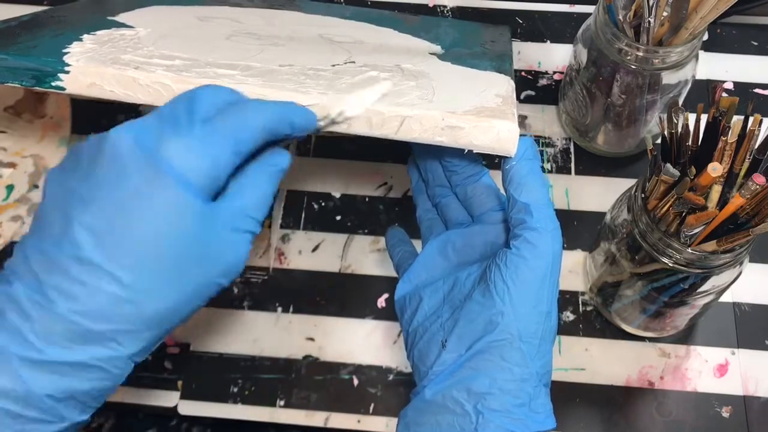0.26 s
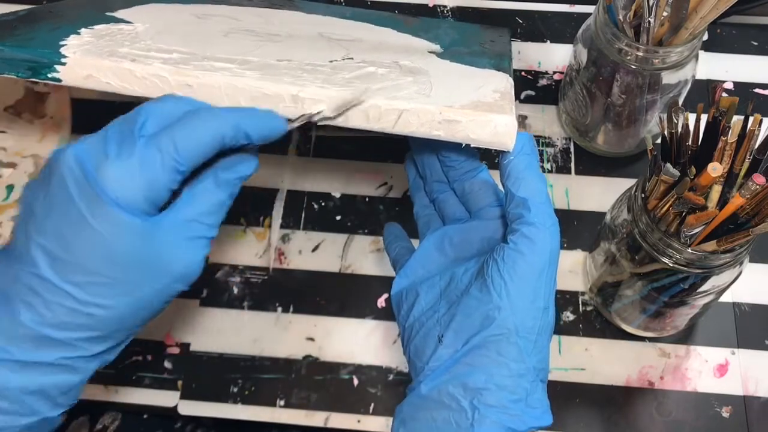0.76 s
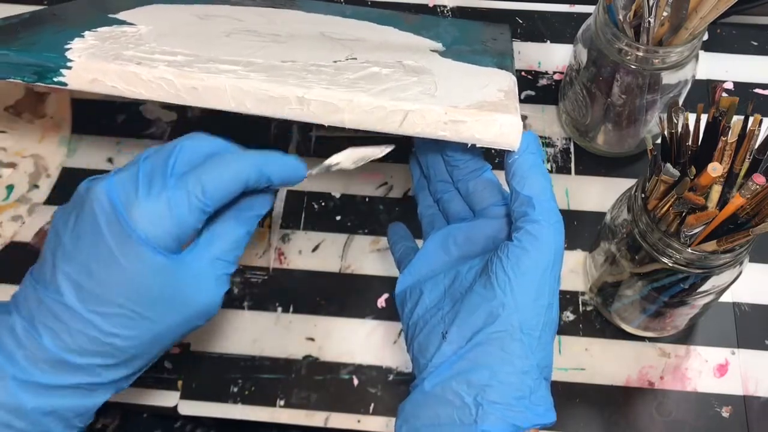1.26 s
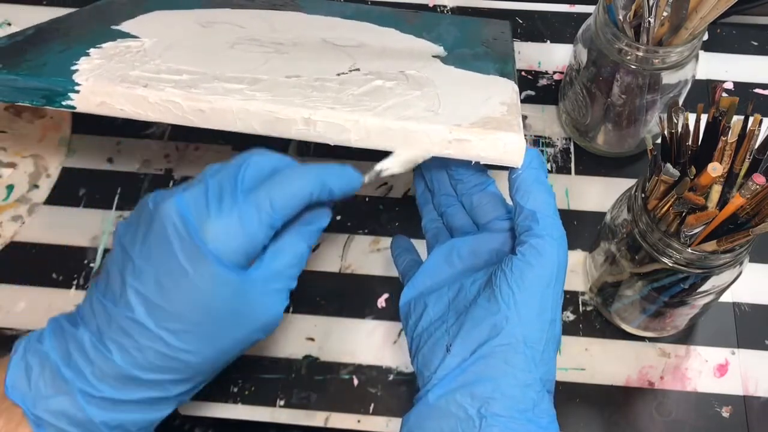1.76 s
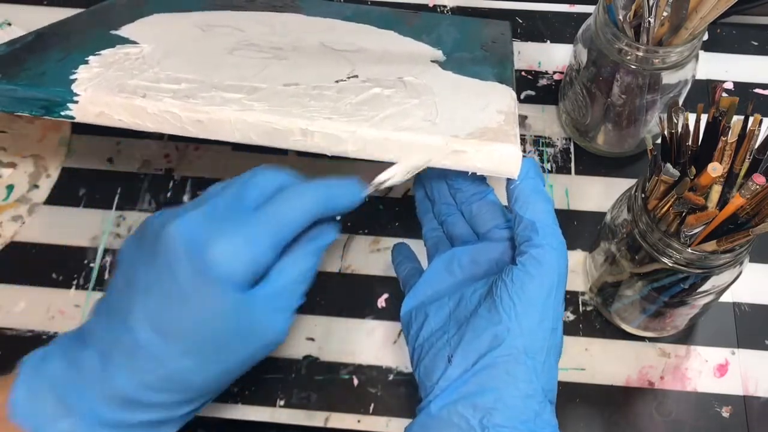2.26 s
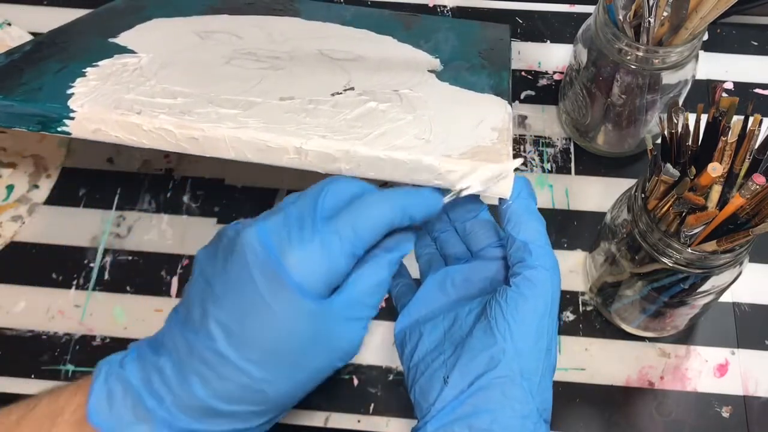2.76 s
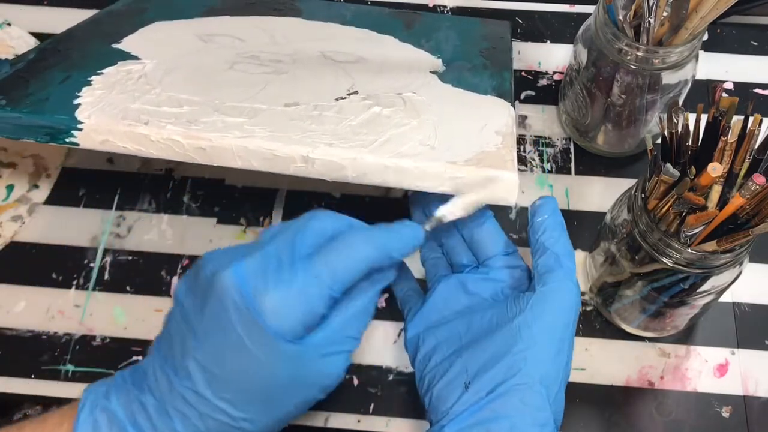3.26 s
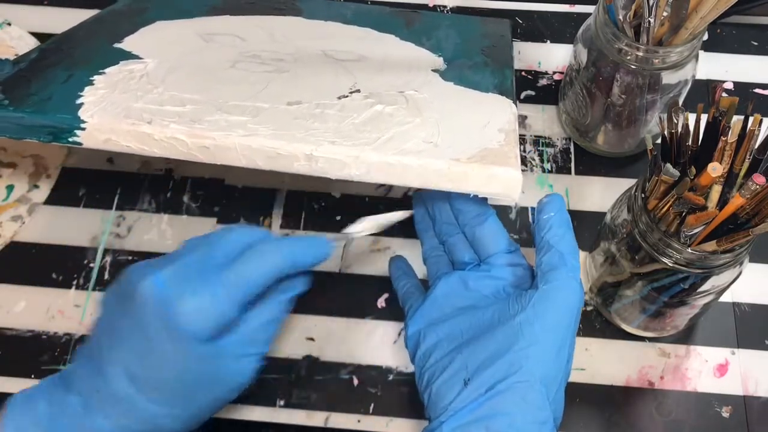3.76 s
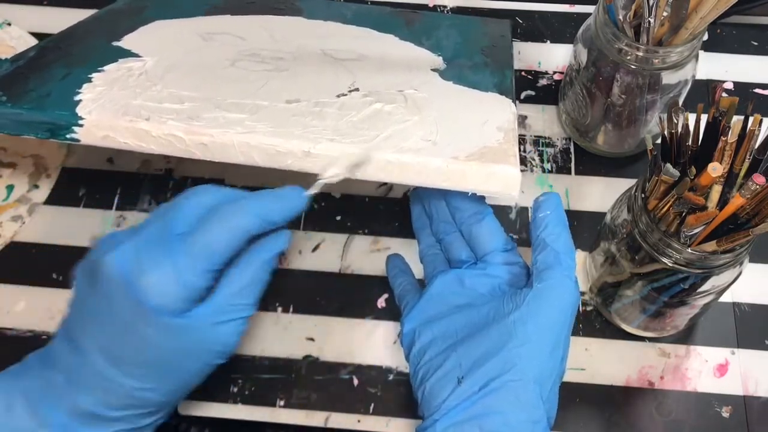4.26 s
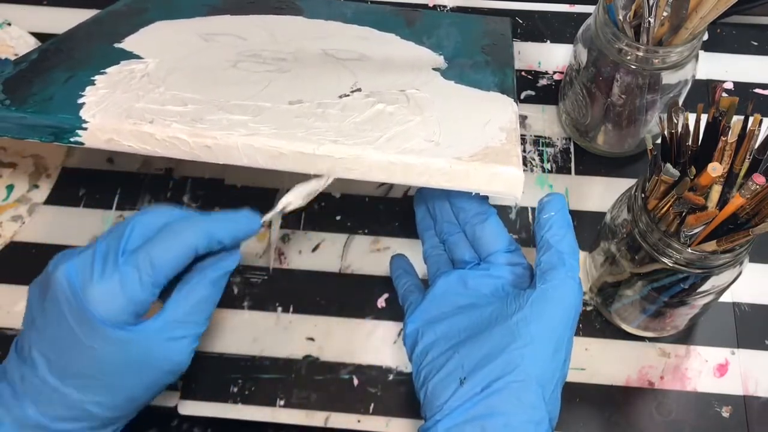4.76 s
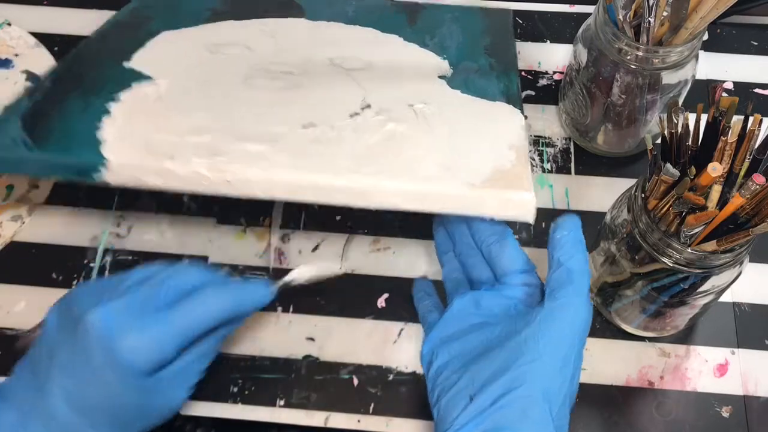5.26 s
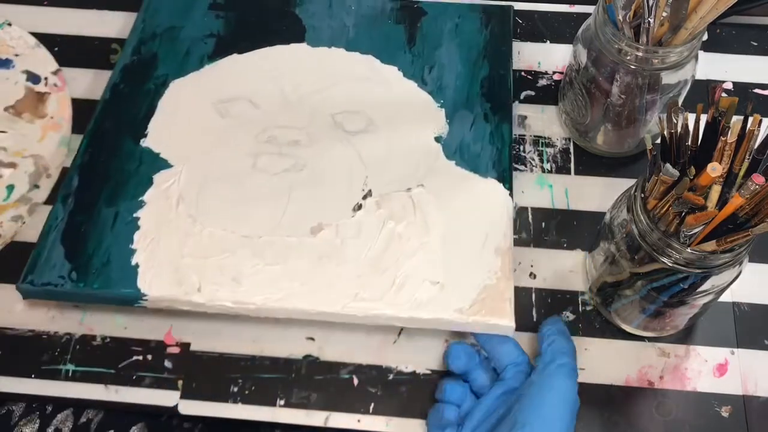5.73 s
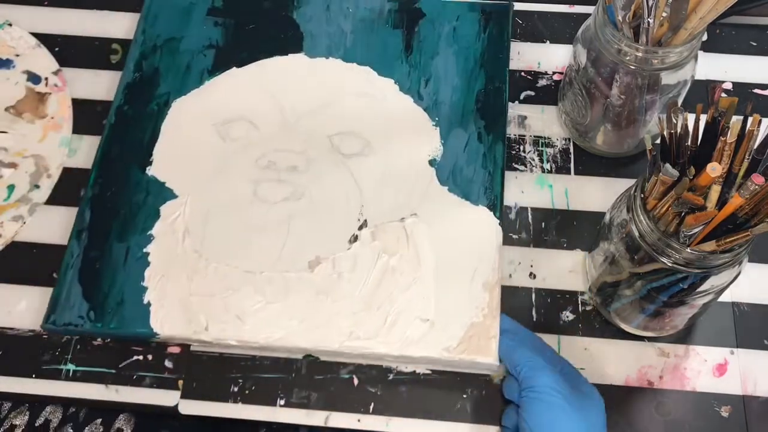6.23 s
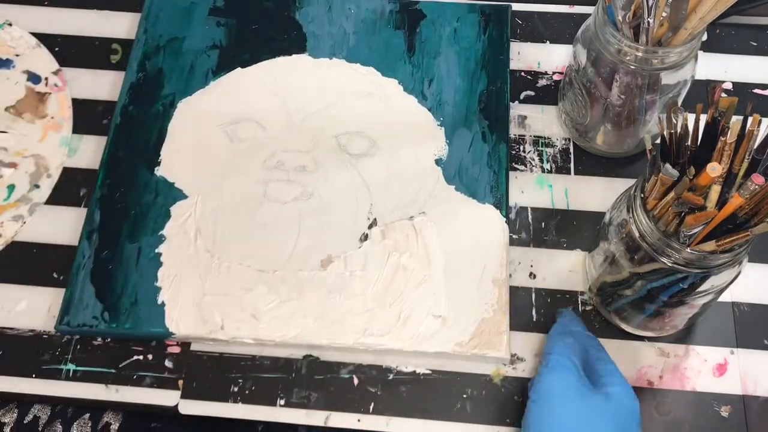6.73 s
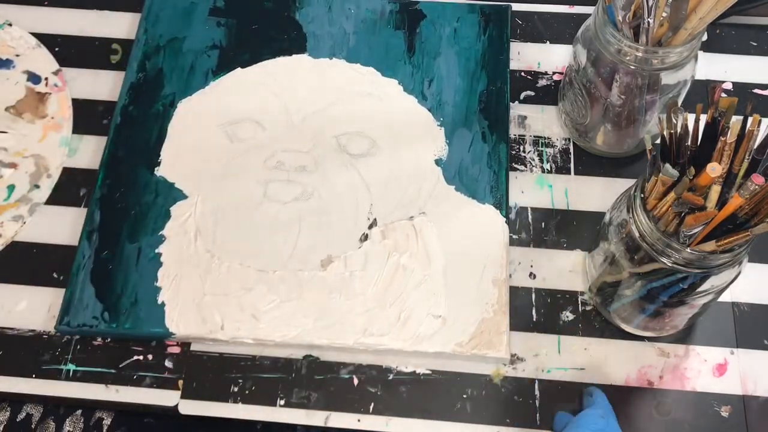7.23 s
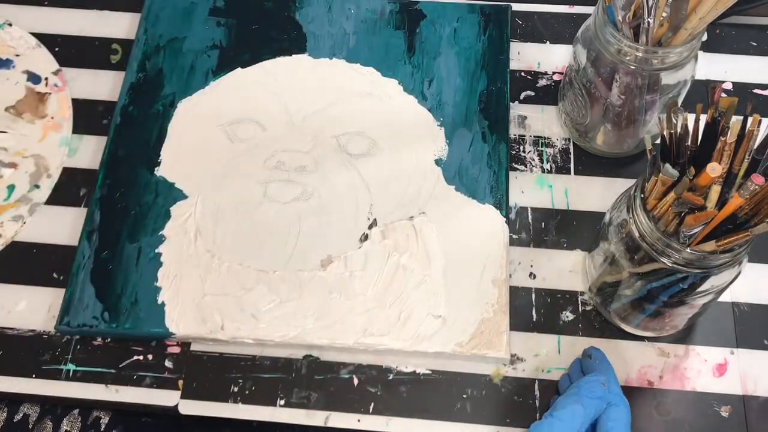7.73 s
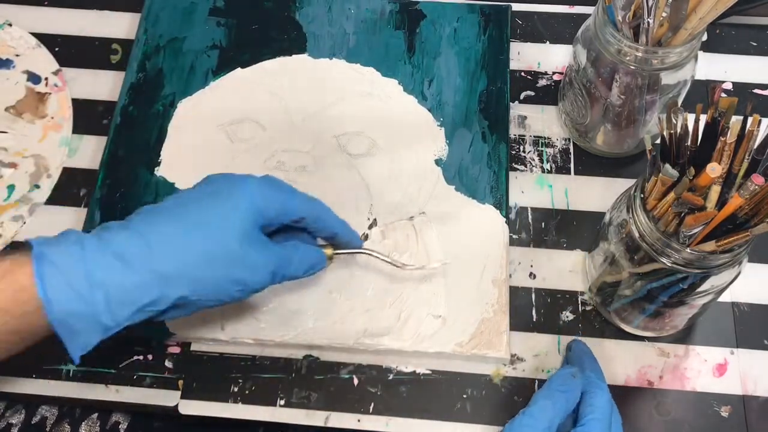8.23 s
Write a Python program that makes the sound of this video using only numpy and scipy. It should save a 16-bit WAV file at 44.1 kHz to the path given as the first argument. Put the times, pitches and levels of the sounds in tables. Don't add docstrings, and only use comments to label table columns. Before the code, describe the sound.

Quiet, irregular dabs and drags of a palette knife on stretched canvas: dry hissy scrapes, small metallic ticks, muffled taps of taut cloth. One firmer wipe ends the painting, the glove rubs the frame, and wood and canvas land with a knock and a louder flat slap shortly after. Glove brushing, a long faint scrape and soft bumps end it. Close microphone, short room reverberation, low swelling room tone.

```python
import sys
import numpy as np
from scipy import signal
from scipy.fft import rfft, irfft, next_fast_len
from scipy.io import wavfile
from scipy.ndimage import uniform_filter1d

SR = 44100
rng = np.random.default_rng(int(sys.argv[2]) if len(sys.argv) > 2 else 0)


def boost_factor(decibels):
    exponent = np.asarray(decibels, float) / 20
    return 10 ** exponent


def dump(signal):
    limited = np.clip(np.atleast_2d(signal).T, -1, 1)
    pcm = np.round(limited * 32767).astype(np.int16)
    wavfile.write(sys.argv[1], SR, pcm)


N = 374409

# share of its length, level/dB below its top
PRESS_SHAPE = [(0, -25), (.14, -10), (.68, 0), (1, -22)]
FLICK_SHAPE = [(0, -22), (.3, 0), (1, -18)]
DRAG_SHAPE = [(0, -16), (.22, 0), (.8, -1), (1, -18)]
PULL_SHAPE = [(0, -4), (.12, 0), (.96, -1), (1, -11)]
# t/s, length/s, level/dB, fizz level/dB, rub f/Hz
KNIFE_PRESSES = [(.88, .12, -64, -1, 2900), (1.46, .1, -61.5, -7, 2430),
                                                  (1.97, .11, -69, -1, 2750), (2.38, .08, -66, -11, 3400),
                                                  (2.86, .13, -64, -3, 4000), (3.73, .11, -62.5, -5, 3300),
                                                  (4.66, .09, -68, -12, 3200), (7.28, .155, -67, -9, 3300)]
# t/s, length/s, level/dB, fizz level/dB, rub f/Hz
KNIFE_FLICKS = [(0, .07, -73, -1, 3290), (.66, .08, -77, 9, 2960), (1.235, .05, -66, -4, 3200),
                (1.58, .09, -71, -7, 3200), (1.76, .05, -73, 1, 3270), (3.04, .05, -78, 3, 3100),
                (3.15, .16, -58, -3, 3200), (3.51, .07, -63, -7, 3900), (4.38, .07, -62, -13, 3200),
                (4.86, .12, -73, 5, 3400)]
# t/s, length/s, level/dB, fizz level/dB, rub f/Hz
KNIFE_DRAGS = [
    (.37, .11, -67, -5, 2550),
    (2.26, .13, -73, -8, 3100),
    (4.48, .12, -66, -12, 3700),
    (6.96, .48, -76, -4, 3300),
]
# t/s, level/dB, rub f/Hz
LAST_WIPE = [
    (5.2, -74, 4110),
    (5.228, -58, 4300),
    (5.262, -55, 4200),
    (5.32, -57, 3500),
    (5.345, -54, 2900),
    (5.405, -49.5, 2800),
    (5.47, -68, 3900),
    (5.517, -64, 4900),
    (5.59, -76, 3700),
]
# f/Hz, level/dB per Hz
RUB_BODY = [(530, -44), (900, -5.5), (1880, -5), (2560, -3), (2780, -11), (3290, -2.5), (3820, -4.5),
            (7500, -13), (9750, -32), (16500, -120)]
# f/Hz, level/dB per Hz
RUB_FIZZ = [(3820, -26), (6500, 0.5), (7810, -5), (9750, 4), (10600, -7), (11200, -0.5), (13600, -1),
            (16200, -9.5)]
# f/Hz, level/dB, t60/s
BLADE_MODES = [(1604, -7, .03), (2770, -6, 0.073), (3400, -14.5, 0.071), (4240, -8, 0.03), (4600, -8, .04),
               (5865, -6, 0.055), (6380, -12, 0.07), (9580, -11, 0.04), (11140, -10, 0.022),
               (13500, -9, .03)]
# t/s, peak level/dB, top band level/dB, low band level/dB, pitch f/Hz
BLADE_TICKS = [(0.0133, -60.5, -3, -3, 3500), (0.8863, -57.5, -1, -9, 2340), (0.9488, -39.5, -4, -18, 6440),
               (1.2462, -49, -5, -7.5, 3300), (1.479, -56, -12, 0, 2340), (1.5199, -57, -12, 1, 2300),
               (1.9797, -62, -15, 7.5, 2470), (2.267, -53.5, -17, -3.5, 6470), (2.3461, -55, -8, -16, 3600),
               (2.389, -58, -11, -15, 3420), (2.678, -44, -10, -28, 2650), (3.026, -71, 5, -7, 2720),
               (3.1576, -59.5, -8, -2, 3280), (3.2999, -64, -13, -2, 2930), (3.5272, -54.5, -18, -19, 4350),
               (3.7495, -56.5, -8, -2, 2340), (3.7944, -54, -7, -10, 3320), (4.0754, -62, -2, 11, 4600),
               (4.6716, -56, -19, 2, 2680), (4.9546, -62, -3, -9, 5780), (5.21, -61, -14, -3, 3320),
               (5.2507, -35.5, 0.5, -21, 4150)]
# t/s, length/s, level/dB, pitch f/Hz, upper mode level/dB
BAR_HUMS = [
    (.38, .1, -60, 905, -11),
    (.88, .05, -62, 850, -12),
    (.9, .06, -73, 900, 9),
    (1.475, .08, -68, 925, 5),
    (7.3, .13, -64, 810, -18),
]
# t/s, length/s, level/dB, centre f/Hz, width/Hz
SWISHES = [(.96, .25, -73, 1650, 600), (1.236, .04, -65, 3100, 1100), (5.22, .22, -66, 5870, 220),
           (5.225, .09, -62, 4600, 260), (5.33, .11, -55, 3250, 420), (5.365, .075, -57, 6400, 1300),
           (5.72, .45, -66, 1730, 480), (7.1, .34, -81, 5800, 380), (7.18, .24, -82, 9550, 260),
           (8.35, .2, -71, 2900, 1600)]
# t/s, peak level/dB
CLOTH_PUSHES = [(0.028, -58), (0.45, -60), (0.896, -50), (1.248, -57), (1.489, -59), (1.783, -57.5),
                (1.979, -59.5), (2.28, -58), (2.909, -63), (3.789, -58), (4.074, -54.5), (4.399, -54.5),
                (4.677, -54.5), (4.965, -55.5), (5.248, -54), (5.878, -53.5), (6.049, -51.5),
                (7.967, -51.5)]
# t/s, level/dB, fizz level/dB
LOWERING = [
    (5.58, -73, 3),
    (5.652, -78, 1),
    (5.772, -70, -9),
    (5.916, -69, -6),
    (5.982, -68, -3.5),
    (6.048, -56, 1),
    (6.138, -67.5, -2.5),
    (6.212, -60.5, 3),
    (6.33, -74, -3),
]
# t/s, length/s,
# level/dB, fizz level/dB, rub f/Hz
GLOVE_SWELLS = [(6.52, .095, -59, -3, 4700), (6.63, .075, -63, 1, 5800), (7.78, .075, -70.5, -1, 4200),
                (8.15, .13, -66.5, 3, 5100), (8.34, .2, -69, -14, 4200)]
# t/s, length/s, level/dB, fizz level/dB, rub f/Hz
GLOVE_BRUSHES = [(6.33, .16, -65, -9, 4450), (6.59, .09, -58, 1, 4350), (7.66, .07, -77, 7, 4400),
                 (7.95, .06, -69, -1.5, 4050), (8.11, .08, -67, -3, 4700)]
# t/s, length/s, level/dB, fizz level/dB, rub f/Hz
SLEEVE_PULL = (6.69, .305, -64, -5, 4000)
# t/s, peak level/dB, top band level/dB, low band level/dB, pitch f/Hz
DRY_CLICKS = [(5.451, -46, -24, -15, 3200), (5.5044, -52, -11, -13, 5200), (5.7168, -55, -17, -7, 4530),
              (5.738, -55.5, -12, -9, 4490), (5.7664, -54, -20, -9, 4550), (5.7897, -55, -12, -12, 4870),
              (6.22, -23.5, -20, -15, 4330), (6.2377, -38, -12, -8, 3110), (6.357, -41, -22, -16, 4630),
              (6.4956, -54, -24, -11, 4320), (6.6772, -47, -14, -12, 6960), (7.9688, -50.5, -8, -11, 3100),
              (8.309, -60, -19, -8, 5930), (8.4342, -56, -17, -11, 5280)]
# t/s, blow level/dB, contact/s, bar ring level/dB, thud level/dB
TABLE_KNOCKS = [
    (6.2222, -31, 0.00074, 12, 3),
    (6.2325, -22, 0.0016, 0, 0),
    (6.357, -45.5, 0.0006, -3, -5),
    (6.5883, -22, 0.0004, 5, -1),
    (6.5921, -17, 0.0005, 3, -1),
]
# t/s, peak level/dB
WOOD_SLAPS = [
    (6.5857, -33),
    (6.5873, -10.5),
]
# t/s, level/dB
CLOTH_BOOMS = [
    (6.04, -60),
    (6.2395, -29),
    (6.594, -31),
    (7.967, -61),
]
# f/Hz, level/dB, t60/s
CLOTH_MODES = [(108.6, -3.5, 0.39), (167.5, -6.5, .25), (212, -12, 0.2), (266, -3.5, 0.14),
               (345.7, -6.5, 0.14), (366, -8, .1), (460, -16, .09), (560, -13, 0.059)]
# f/Hz, level/dB, t60/s
BAR_MODES = [(670, -23, 0.037), (779, 3.5, .055), (930, -10, .06), (1005, -5, 0.067), (1188, -6, .06),
             (1410, -8, .06), (1573, -8, .06), (1760, -10, .06), (1900, -13, .05), (2340, -17, .04)]
# f/Hz, level/dB per Hz
TABLE_THUD = [(120, -14), (170, -3), (260, -1), (400, -2), (600, -13), (1050, -4), (1400, -7), (2000, -17),
              (3000, -30), (3900, -55), (6600, -120)]
# f/Hz, t60/s
ROOM_DECAY = [(100, 0.5), (500, .45), (1500, 0.42), (4000, 0.22), (12000, 0.23)]
# f/Hz, level/dB per Hz
ROOM_AIR = [(15, -46.5), (25, -19), (39, 2), (59, 3.5), (85, -15.5), (186, -12), (250, -13.5), (286, -11.5),
            (823, -20.5), (943, -18), (1300, -24.5), (1490, -24), (3460, -33.5), (13000, -39), (16200, -42)]
# f/Hz, width/Hz, level/dB
HOUSING_DIP = (10330, 390, -4)


def strokes():
    grit = boost_factor(4.5 * np.minimum(rng.exponential(1, N), 3)) * (rng.random(N) < 900 / SR)
    clumps = boost_factor(2.5 * evened(uniform_filter1d(rng.standard_normal(N), 500)))
    slips = rng.standard_normal(N) * (1 + grit)
    body, fizz = colour(slips, RUB_BODY), colour(slips, RUB_FIZZ)
    blade = band(signal.oaconvolve(slips, ring(BLADE_MODES, .1, damping=0.71))[:N], 1800, 8400)

    knife = gestures(PRESS_SHAPE, KNIFE_PRESSES) + gestures(FLICK_SHAPE, KNIFE_FLICKS)
    knife += gestures(DRAG_SHAPE, KNIFE_DRAGS)
    knife.append([(s, db, -4, hz) for s, db, hz in LAST_WIPE])
    hand = gestures(PRESS_SHAPE, GLOVE_SWELLS) + gestures(FLICK_SHAPE, GLOVE_BRUSHES)
    hand += gestures(PULL_SHAPE, [SLEEVE_PULL])
    hand.append([(*row, 4600) for row in LOWERING])

    out = np.zeros(N)
    blade_share = .16
    for rows in knife:
        at, level, rub = slide(slips, body, fizz, rows, focus=.4, width_hz=1100)
        mixed = np.sqrt(1 - blade_share) * rub + np.sqrt(blade_share) * blade[at]
        out[at] += level * clumps[at] * mixed
    for rows in hand:
        at, level, rub = slide(slips, body, fizz, rows, focus=0.24, width_hz=3300)
        out[at] += level * rub
    return out


def slide(slips, body, fizz, rows, focus, width_hz):
    s, *columns = np.transpose(rows)
    at = np.arange(round(s[0] * SR), min(round(s[-1] * SR), N))
    db, top_db, hz = (np.interp(at / SR, s, c) for c in columns)
    first = evened(resonate(resonate(slips[at], hz, width_hz), hz, width_hz))
    second = evened(resonate(resonate(slips[at], 1.95 * hz, width_hz), 1.95 * hz, width_hz))
    level = boost_factor(db - 1.5) * signal.windows.tukey(len(at), min(1, 700 / len(at)))
    return at, level, 0.84 * body[at] + focus * (first + 0.3 * second) + boost_factor(top_db) * fizz[at]


def gestures(shape, events):
    return [[(start + share * length, db + drop_db, *steady) for share, drop_db in shape]
            for start, length, db, *steady in events]


def tick(db, top_db, low_db, hz):
    return click(db, top_db, low_db, hz, .02) + boost_factor(db - 5.5) * ring(BLADE_MODES, 4000 / SR, spread_db=2.2)


def hums():
    out = np.zeros(N)
    for start, length, db, hz, upper_db in BAR_HUMS:
        noise = rng.standard_normal(round(length * SR))
        lower = evened(resonate(noise, hz, 79))
        upper = evened(resonate(noise, 2360, 140))
        hum = lower + boost_factor(upper_db) * upper
        add(out, start, boost_factor(db) * hum * signal.windows.tukey(len(noise), .7))
    for start, length, db, hz, width in SWISHES:
        noise = rng.standard_normal(round(length * SR))
        swish = evened(resonate(resonate(noise, hz, width), hz, width))
        add(out, start, boost_factor(db) * swish * signal.windows.tukey(len(noise), .6))
    return out


def click(db, top_db, low_db, hz, t60):
    t, noise = np.arange(4000) / SR, rng.standard_normal((3, 4000))
    fall = boost_factor(-60 * t / t60)
    rattle = fall + 0.11 * boost_factor(-60 * t / 0.14)
    crack = 0.58 * band(noise[0], 2600, 6400) * rattle + 0.6 * np.sin(2 * np.pi * hz * t) * fall
    top = boost_factor(top_db) * band(noise[1], 7700, 13300) * rattle
    low = boost_factor(low_db) * band(noise[2], 830, 1900) * fall ** 0.37
    return boost_factor(db) * (1 - np.exp(-t / 0.00037)) * (crack + top + low)


def knock(db, contact, bars_db, damping, thud_db):
    t = np.arange(round(.6 * SR)) / SR
    blow = np.sin(np.pi * np.linspace(0, 1, max(round(contact * SR), 4)))
    cloth = ring(CLOTH_MODES, .6, damping, spread_db=1.5) * (1 - np.exp(-t / 0.004))
    bars = ring(BAR_MODES, .6, damping, spread_db=1.0)
    thud_fall = boost_factor(-60 * t / 0.079) + 0.3 * boost_factor(-60 * t * damping / .58)
    thud = colour(rng.standard_normal(len(t)), TABLE_THUD) * thud_fall * (1 - np.exp(-t / 0.0019))
    body = cloth + boost_factor(bars_db) * bars + boost_factor(thud_db) * thud
    return boost_factor(db) * 0.45 * signal.oaconvolve(body, blow / blow.sum())


def slap(db):
    t, noise = np.arange(4000) / SR, rng.standard_normal(4000)
    crack = band(noise, 3000, 10000) * boost_factor(db - 60 * t / .0033)
    return crack + band(noise, 1800, 7000) * boost_factor(db - 18 - 60 * t / .05)


def boom(db):
    t = np.arange(SR // 2) / SR
    return boost_factor(db - 60 * t / .4) * (1 - np.exp(-t / .004)) * np.sin(2 * np.pi * 108.6 * t)


def room(x):
    taps = np.zeros(SR)
    at = np.arange(200, SR - 20, 20)
    taps[at + rng.integers(0, 20, len(at))] = rng.choice([-1., 1.], len(at))
    hz, t, z = signal.stft(taps, SR, nperseg=256)
    fall = boost_factor(-60 * t / read(ROOM_DECAY, hz)[:, None])
    tail = signal.istft(z * fall * (hz > 150)[:, None], SR, nperseg=256)[1]
    return signal.oaconvolve(x, tail / np.linalg.norm(tail))[:N]


def room_tone():
    frames, hz = N // 256 + 5, np.fft.rfftfreq(1024, 1 / SR)
    a, b, patches = rng.standard_normal((frames, 513, 3)).T
    patches = evened(uniform_filter1d(uniform_filter1d(patches, 10, 0), 16, 1))
    z = (a + 1j * b) * boost_factor(read(ROOM_AIR, hz)[:, None] + 0.53 * patches)
    return boost_factor(-58.5) * evened(signal.istft(z, nperseg=1024, noverlap=768)[1][:N])


def ring(modes, seconds, damping=0.92, spread_db=0.):
    t, out = np.arange(round(seconds * SR)) / SR, 0
    for (hz, db, t60), draw in zip(modes, rng.standard_normal(len(modes))):
        out = out + boost_factor(db + spread_db * draw - 60 * t * damping / t60) * np.sin(2 * np.pi * hz * t)
    return out


def resonate(x, hz, width):
    turn = np.exp(2j * np.pi * np.cumsum(hz * np.ones(len(x))) / SR)
    r = np.exp(-np.pi * width / SR)
    return 2 * (turn * signal.lfilter([1 - r], [1, -r], x / turn)).real


def colour(x, points):
    size = next_fast_len(len(x))
    gain = boost_factor(read(points, np.fft.rfftfreq(size, 1 / SR)))
    return evened(irfft(rfft(x, size) * gain, size)[:len(x)])


def band(x, lo_hz, hi_hz):
    return evened(signal.sosfilt(signal.butter(2, [lo_hz, hi_hz], "band", fs=SR, output="sos"), x))


def evened(x):
    return x / np.sqrt(np.mean(x ** 2) + 1e-20)


def read(points, hz):
    f, value = np.transpose(points)
    return np.interp(np.log(hz + 1), np.log(f + 1), value)


def add(mix, s, sound):
    part = mix[round(s * SR):][:len(sound)]
    part += sound[:len(part)]


def scene():
    near, table = strokes() + hums(), np.zeros(N)
    for s, *row in BLADE_TICKS:
        add(near, s, tick(*row))
    for s, *row in DRY_CLICKS:
        add(near, s, click(*row, t60=.019))
    for s, db in CLOTH_PUSHES:
        add(near, s, knock(db + 8.5, contact=.0016, bars_db=-1, damping=1.66, thud_db=-4.5))
    for s, db in WOOD_SLAPS:
        add(table, s, slap(db))
    for s, db, contact, bars_db, thud_db in TABLE_KNOCKS:
        add(table, s, knock(db, contact, bars_db, 1.3, thud_db))
    for s, db in CLOTH_BOOMS:
        add(table, s, boom(db))
    reverb = boost_factor(-12.5) * room(near + boost_factor(-11) * table)
    return (near + table + reverb + room_tone())[None]


def low_pass(x):
    return signal.sosfilt(signal.butter(12, 16990, fs=SR, output="sos"), x)


def record(dry):
    hz, width, db = HOUSING_DIP
    f = np.fft.rfftfreq(1024, 1 / SR)
    shape_db = db * np.exp(-((f - hz) / width) ** 2) - 14 * (f > 15900)
    taps = np.fft.fftshift(irfft(boost_factor(shape_db))) * np.hanning(1024)
    cut = signal.sosfilt(signal.butter(2, 42, "high", fs=SR, output="sos"), dry)
    return low_pass(signal.oaconvolve(cut, taps[None], "same"))


dry = scene()
out = record(dry)
dump(out)
```